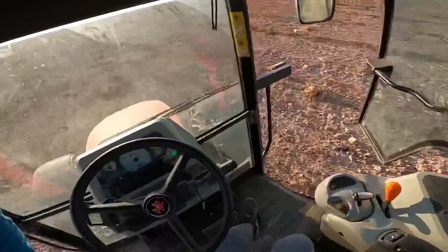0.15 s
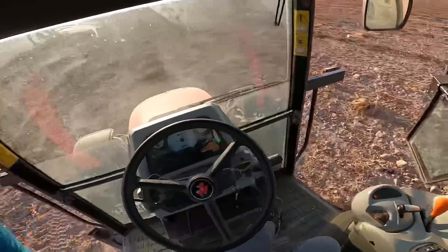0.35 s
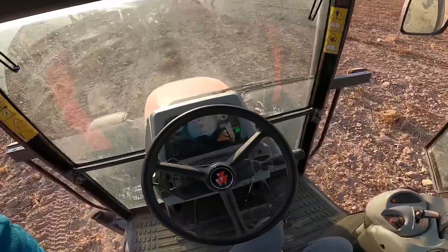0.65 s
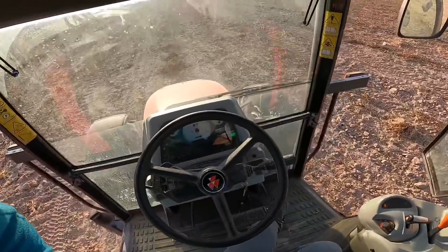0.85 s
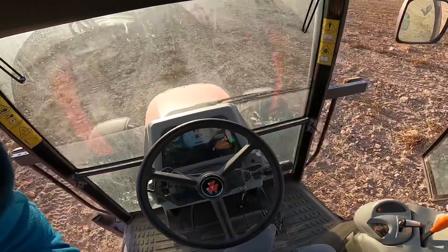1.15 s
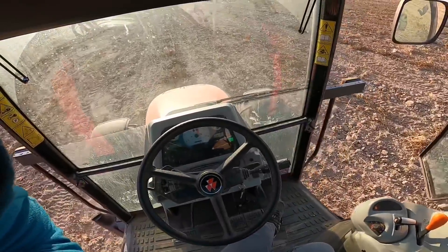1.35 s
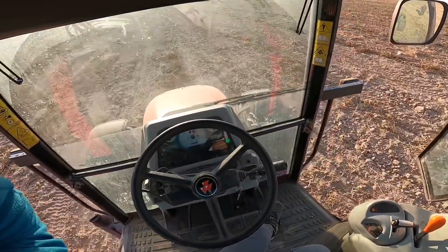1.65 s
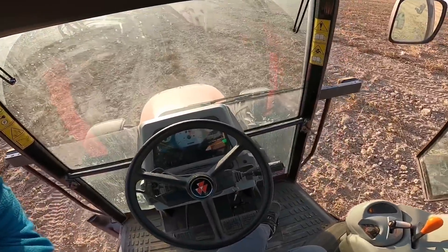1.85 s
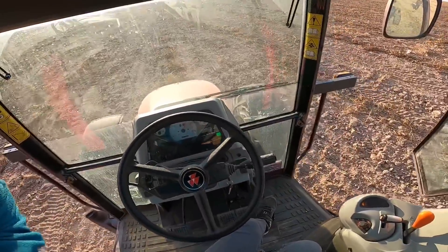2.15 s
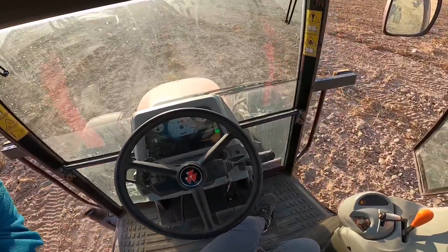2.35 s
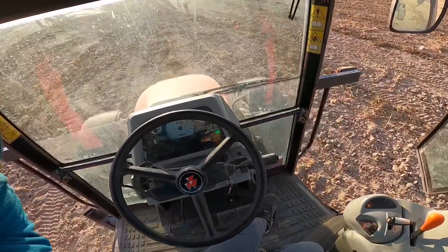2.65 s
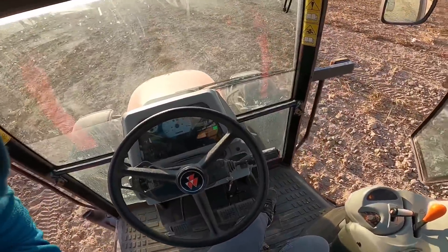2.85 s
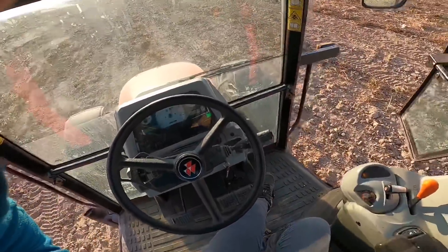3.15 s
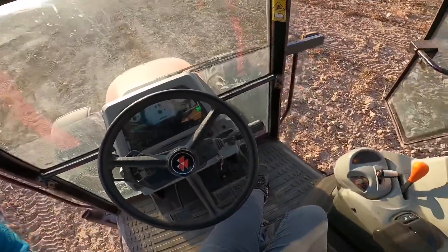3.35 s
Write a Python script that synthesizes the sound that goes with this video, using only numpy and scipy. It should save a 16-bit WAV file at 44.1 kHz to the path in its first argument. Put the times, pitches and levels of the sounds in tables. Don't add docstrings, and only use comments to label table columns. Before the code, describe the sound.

Steady tractor diesel drone in a cab, deep humming boom under clattering knock and whining gears

```python
import sys
import numpy as np
from scipy import signal
from scipy.fft import rfft, irfft, next_fast_len
from scipy.io import wavfile
from scipy.ndimage import uniform_filter1d, map_coordinates

SR = 44100
rng = np.random.default_rng(int(sys.argv[2]) if len(sys.argv) > 2 else 0)


def field_ratio(decibels):
    return 10 ** (np.asarray(decibels, dtype=float) / 20)


def wrap_up_sound(samples):
    columns = np.atleast_2d(samples).T
    tamed = np.clip(columns, -1, 1)
    steps = np.round(tamed * 32767).astype(np.int16)
    wavfile.write(sys.argv[1], SR, steps)


N = 154350

# f/Hz, level/dB per Hz
WASH = [(20, -53), (150, -54), (300, -55), (900, -60), (2000, -63.5), (4000, -72), (7500, -80),
        (8300, -101)]
# f/Hz, level/dB per Hz
FIZZ = [(7500, -101), (10500, -99), (12500, -106), (15500, -118)]
# f/Hz, width/Hz, level/dB
CAB_TONE = [(281, 48, 4.5), (245, 39, -5), (399.4, 64.4, -9), (590, 150, 0), (828, 128, -6.5),
            (1150, 140, -2), (2330, 170, 0.5), (5790, 99, 5)]
# order/per cycle, level/dB, wander/dB
PUMPS = [(15.8, -39, 1.5), (41.68, -37, 1.2), (66.4, -47, 2.5), (83.36, -44, 3), (99.55, -46, 2),
         (198.9, -54, 2)]
# t/s, speed/rpm
CRANK_SPEED = [(0.15, 1683.8), (0.44, 1690.8), (0.73, 1689.6), (1.02, 1691.1), (1.31, 1691.4),
               (1.6, 1689.4), (1.9, 1687.0), (2.19, 1685.6), (2.48, 1688.9), (2.77, 1690.4), (3.06, 1687.9),
               (3.35, 1688.2)]
# order/per cycle, level/dB
BOOM = [(1, -42), (2, -36), (3, -54), (4, -15), (5, -35.5), (6, -40), (7, -59), (8, -32), (9, -36.5),
        (10, -33.5), (11, -71), (12, -34.5), (13, -40.5), (14, -44.5), (15, -43), (16, -43.5), (17, -48.5),
        (18, -39), (19, -35.5), (20, -38), (21, -39.5)]
# f/Hz, level/dB per order
KNOCK = [(300, -47), (600, -56.5), (800, -63.5), (1000, -54), (2050, -55.5), (2250, -60), (3600, -62.5),
         (8000, -82.5)]
MESH_ORDERS = [31, 35, 40, 42, 47, 48, 51, 52, 64, 67, 68, 74, 75, 77, 79, 80, 82, 84, 95, 100, 101, 104,
               108, 109, 111, 112, 116, 120, 130, 136, 138, 144, 150, 168, 192, 204, 208, 57, 70, 72, 90,
               98, 102, 115, 128, 132, 134, 148]
MESH_LEVELS = [-46.5, -43.5, -46, -46, -48.5, -36, -51, -49.5, -46, -43, -45, -45.5, -41, -48.5, -48.5,
               -41.5, -45.5, -43, -50, -47.5, -62.5, -51.5, -46, -41, -59.5, -45, -41, -47.5, -42, -46,
               -39.5, -43, -45, -39.5, -53.5, -51, -48, -56, -46, -53.5, -46.5, -49, -45, -53.5, -48, -51.5,
               -53, -46.5]
LATE_ORDERS = [130, 168]
STILL_ORDERS = [116, 136, 138, 144]
# place/share of cycle, ring f/Hz, level/dB
TAPS = [(.72, 1170, 3), (.89, 1040, 2), (.29, 1480, 1), (.37, 2100, 2), (.82, 1760, 0), (.14, 3000, 1),
        (.2, 2300, -2), (.43, 3150, -2), (.87, 3450, -3), (.67, 3500, -3), (.65, 4200, -4), (.04, 920, -4),
        (.99, 1900, -1), (.6, 1720, -3), (.46, 1280, -3), (.5, 1900, -4), (.05, 1550, -3), (.21, 3450, -4),
        (.24, 2700, -3), (.45, 760, -3), (.66, 480, -2), (.27, 900, -5), (.65, 2520, -4)]
# place/share of cycle, ring f/Hz, level/dB
THUDS = [
    (.108, 70, 0),
    (.102, 134, 0),
    (.219, 281, 0),
]
# t/s, level/dB
TURN = [
    (0, -3.5),
    (.17, -1.5),
    (.3, -1),
    (3.5, -3),
]
# t/s, level/dB
FACING = [
    (0, -19),
    (.15, -9),
    (.3, 2),
    (.45, 0.5),
    (3.5, 0.5),
]
# t/s, level/dB
SETTLE = [
    (0, -3),
    (.3, -7.5),
    (.8, -4.5),
    (1.3, 1),
    (2.2, -1.5),
    (2.5, -3),
    (2.9, -0.5),
    (3.5, -1),
]
# t/s, level/dB
STILL = [
    (0, -1),
    (.7, -1.5),
    (1.2, 2),
    (2.1, 2.5),
    (2.5, -1.5),
    (3, -1),
    (3.5, -1.5),
]
# t/s, level/dB
DOOR = [
    (0, 2.5),
    (.2, 1),
    (.4, -0.9),
    (1.2, -0.5),
    (2.1, -0.3),
    (2.8, 0.3),
    (3.5, 1),
]
# f/Hz, likeness/0-1
ALIKE = [(60, 0.96), (130, 0.94), (250, 1), (980, 0.92), (1960, 0.4), (3930, 0.15), (7900, 0.011)]
# f/Hz, level/dB
LEAN = [(60, .5), (180, -.5), (310, -.5), (520, .5), (900, .5), (1550, 3), (7500, 2.5), (9500, -2.8)]
# f/Hz, phase/rad
LEAD = [(60, 0), (600, 0.39), (950, 0.51), (2330, -1.75), (3600, -0.8), (4740, -2.5), (8100, -13.5)]


def read(table, hz):
    points = np.array(table, float)
    return np.interp(np.log(np.maximum(hz, 1)), np.log(points[:, 0]), points[:, 1])


def curve(table):
    points = np.array(table, float)
    return np.interp(np.arange(N) / SR, points[:, 0], points[:, 1])


def walk(rate_hz):
    hold = int(SR / rate_hz)
    steps = np.repeat(rng.standard_normal(N // hold + 1), hold)
    smooth = uniform_filter1d(uniform_filter1d(steps, hold), hold)
    return 1.3 * smooth[:N]


def ports(hz, shared, unshared):
    likeness = np.sqrt(np.clip(read(ALIKE, hz), 0, 1))
    mid = shared * np.sqrt((1 + likeness) / 2)
    side = unshared * np.sqrt((1 - likeness) / 2)
    lean = field_ratio(read(LEAN, hz) / 2) * np.exp(.5j * read(LEAD, hz))
    return np.array([(mid + side) * lean, (mid - side) / lean])


def cab_db(hz):
    return sum(db * np.exp(-((hz - f) / width) ** 2) for f, width, db in CAB_TONE)


def wash(cycle):
    size = next_fast_len(N)
    hz = np.arange(size // 2 + 1) * SR / size
    hiss = field_ratio(read(WASH, hz) + cab_db(hz)) * (hz < 8500)
    fizz = field_ratio(read(FIZZ, hz)) * (hz > 7000) * (hz < 15700)
    colour = (hiss + fizz) * np.sqrt(SR / 2)

    def noise():
        return rfft(rng.standard_normal(size)) * colour

    both = ports(hz, noise(), noise())
    swell = walk(1.91)
    place = 2 * np.log2(np.maximum(hz, 20) / 20)
    throb_db = 1 * np.cos(2 * np.pi * 4 * (cycle - .15))
    out = 0
    for band in range(20):
        share = np.cos(np.pi / 2 * np.clip(place - band, -1, 1)) ** 2
        db = .5 * swell + 1.25 * walk(7.98)
        db = db + (band > 15) * throb_db + (band > 17) * walk(2.5)
        out = out + irfft(both * share, size)[:, :N] * field_ratio(db)
    return out


def pumps(cycle):
    out = 0
    for order, db, wander_db in PUMPS:
        lean = ports(np.array([order * 14.07]), 1, .3)
        whine = np.real(lean * np.exp(2j * np.pi * (order * cycle + rng.random())))
        out = out + whine * np.sqrt(2) * field_ratio(db + wander_db * walk(4.94))
    return out


def rhythm(size, cycle_s):
    t = np.arange(size) / size
    shape = rng.standard_normal(size) / 16
    tap_s, thud_s = .002304, .015
    for hits, ring_s, early in ((TAPS, tap_s, tap_s / cycle_s), (THUDS, thud_s, 0)):
        for at, hz, db in hits:
            since = (t - at + early) % 1 * cycle_s
            swell = (since / ring_s) * np.exp(1 - since / ring_s)
            shape = shape + field_ratio(db - 24) * swell * np.sin(2 * np.pi * hz * since)
    phase = np.exp(1j * np.angle(rfft(shape)))
    phase[[2, 4, 8, 12]] = [-1j, 1, -1j, -1]
    return phase


def engine(cycle):
    size = 8192
    order = np.arange(size // 2 + 1)
    hz = order * np.mean(np.array(CRANK_SPEED)[:, 1]) / 120
    scatter_db = 6.5 * np.clip(rng.standard_normal(len(order)), -3, 1)
    db = read(KNOCK, hz) + cab_db(hz) + scatter_db
    for number, level_db in list(BOOM) + list(zip(MESH_ORDERS, MESH_LEVELS)):
        db[int(round(number))] = level_db
    gain = field_ratio(db) * (order > 0) * (hz < 8050) * size / np.sqrt(2)
    at = [(cycle % 1) * size]

    def scrambled():
        return gain * np.exp(2j * np.pi * rng.random(len(order)))

    def play(spectra):
        waves = [irfft(spectrum, size) for spectrum in spectra]
        return np.array([map_coordinates(wave, at, order=1, mode="grid-wrap") for wave in waves])

    shared = gain * rhythm(size, 1 / hz[1])
    steady = ports(hz, shared, np.where(hz < 320, 1j * shared, scrambled()))
    mesh = np.isin(order, MESH_ORDERS)
    late = np.isin(order, LATE_ORDERS)
    still = np.isin(order, STILL_ORDERS)
    gears = play(steady * (mesh & ~late & ~still))
    timing_gears = field_ratio(curve(STILL)) * play(steady * still)
    out = play(steady * ~mesh) + field_ratio(curve(FACING)) * (gears + timing_gears)
    out = out + field_ratio(curve(SETTLE) + 1.3 * walk(6.2)) * play(steady * late)
    loose = field_ratio(-12 - 6.5 * mesh) * np.clip(hz / 1500, .03, 1) ** .5
    for _ in range(4):
        out = out + walk(2.934) * play(ports(hz, loose * scrambled(), loose * scrambled()))
    return out


def scene():
    shaft_twist = 1.5e-5 * 14 * walk(30)
    cycle = np.cumsum(curve(CRANK_SPEED)) / 120 / SR + shaft_twist
    cab = engine(cycle) + pumps(cycle) + wash(cycle)

    def band(low_hz, high_hz):
        return signal.sosfiltfilt(signal.butter(2, [low_hz, high_hz], "band", fs=SR, output="sos"), cab)

    door = band(1800, 3800)
    mids = band(470, 740)
    return cab + (field_ratio(curve(TURN)) - 1) * mids + (field_ratio(curve(DOOR)) - 1) * door


def band_limit(x):
    return signal.sosfilt(signal.butter(12, 15700, fs=SR, output="sos"), x)


def record(dry):
    return band_limit(dry)


dry = scene()
out = record(dry)
wrap_up_sound(out)
```